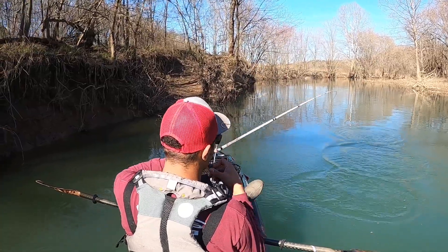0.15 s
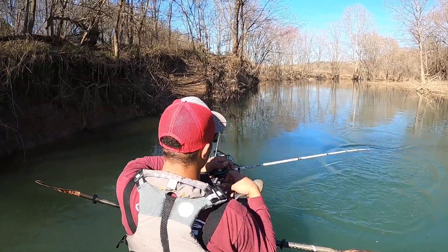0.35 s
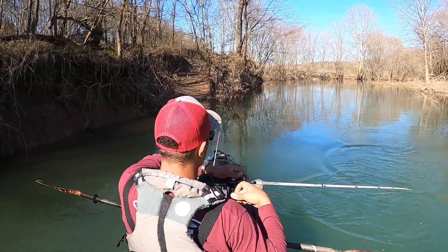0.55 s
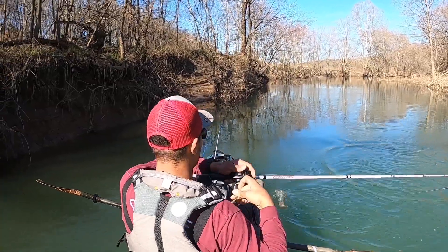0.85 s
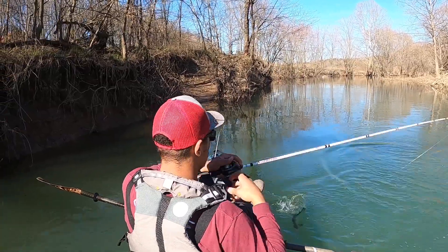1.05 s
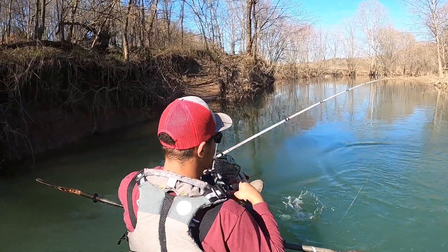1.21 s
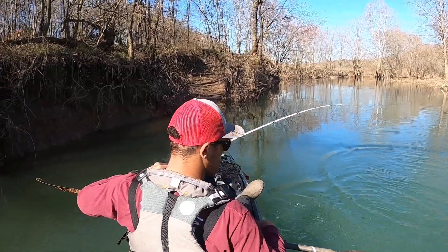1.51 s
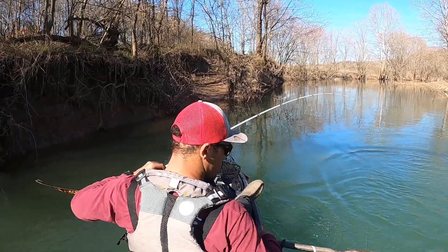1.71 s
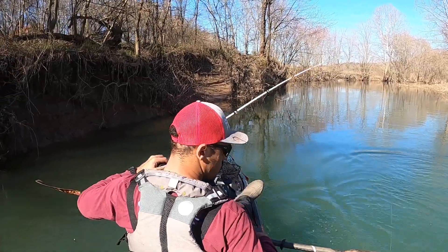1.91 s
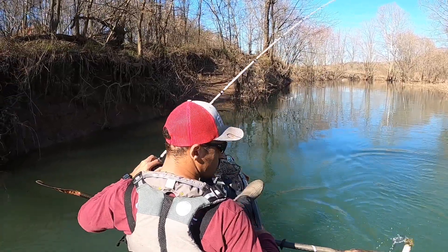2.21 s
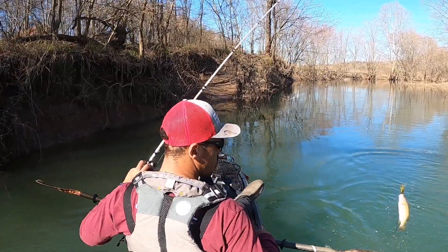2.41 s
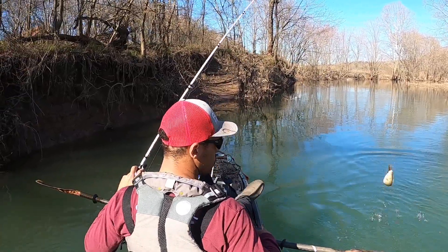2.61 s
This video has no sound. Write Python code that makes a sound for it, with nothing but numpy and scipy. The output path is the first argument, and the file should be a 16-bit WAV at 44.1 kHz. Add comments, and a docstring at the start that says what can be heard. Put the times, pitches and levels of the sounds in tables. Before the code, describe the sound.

Fish thrashing at calm water's surface, two bubbly splashes, preceded by a booming scrape on the hull

```python
"""A small hooked fish thrashes twice at the surface of a calm river beside a kayak: churned water is many
decaying bubble tones, and spray and slaps are shaped noise. Before that, something drags over the hull:
rough noise excites its resonances, which boom up the camera mount. Reel ticks are short damped tones.
Wash, rumble and hiss are filtered noise. The spectra carry the ring near 1.1 kHz and the dull treble
of a closed camera housing."""
import sys
import numpy as np
from scipy import signal
from scipy.fft import rfft, irfft, next_fast_len
from scipy.io import wavfile
from scipy.ndimage import uniform_filter1d, map_coordinates

SR = 44100
rng = np.random.default_rng(int(sys.argv[2]) if len(sys.argv) > 2 else 0)


def transcribe(u):
    """Save the signal u as a 16-bit wav file named by the first command-line argument.

    u: samples, shape (n,) or (channels, n), limited to [-1, 1]; the rate is SR.
    q: integer samples, one column per channel.
    """
    v = np.clip(np.atleast_2d(u).T, -1, 1)
    q = np.round(v * 32767).astype(np.int16)
    wavfile.write(sys.argv[1], SR, q)


def gain_from_db(level_db):
    """Convert decibel levels to linear amplitude factors (20 dB per decade)."""
    decades = np.asarray(level_db, float) / 20
    return 10 ** decades


N = 121275  # length [samples]
OFF_DB = -120  # level outside the span of a level table

# wash on the water, swelling with the bursts: (time [s], level [dB])
WASH_LEVEL = [(0, -56.5), (.9, -56.5), (1.13, -44.5), (1.58, -61), (2.15, -63), (2.37, -43.5),
              (2.55, -59.5), (2.75, -53.5)]
# spectra of wash, low rumble and thin hiss: (frequency [Hz], density [dB])
WASH_SPECTRUM = [(110, -100), (210, -33), (350, -14), (640, -6), (810, -9), (1170, 9), (1520, -4.5),
                 (2250, -16.5), (2700, -36), (4000, -98.5)]
RUMBLE_SPECTRUM = [(22, -13), (56, -11), (103, -25.5), (155, -2.5), (400, -17), (520, -49), (880, -120)]
HISS_SPECTRUM = [(1800, -27.5), (2500, -5.5), (5300, -4.5), (6700, -10.5), (8700, -25.5), (13400, -26),
                 (14000, -94)]
RUMBLE_DB, HISS_OVER_RUMBLE_DB = -67.5, -12.5

# ticks of the reel and a faint scuff: (time [s], level [dB])
TICKS = [(0.1925, -37.5), (0.6374, -39)]
SCUFF = [(.343, -63.5)]
# spectrum of the scuff: (frequency [Hz], density [dB])
SCUFF_SPECTRUM = [(2500, -64), (3250, -9), (3750, -12.5), (4600, -63)]
TICK_HZ, TICK_T60_S, TICK_ATTACK_S = 1837, 0.0098, 0.0012

# dragging on the hull: (time [s], boom level [dB], body over boom [dB], rasp over boom [dB])
DRAG = [(0.08, -72, 13, -4), (0.112, -53, -5.5, -11), (0.222, -61, -5, -18.5), (0.228, -30, 0.5, -2.5),
        (0.244, -23, -12, -8.5), (0.274, -20.5, -12.5, -32.5), (0.306, -24, -32, -27),
        (0.325, -31, -26, -24), (0.332, -27, -1, -7), (0.354, -32, 4, -5.5), (0.426, -20.5, -12, -34),
        (0.442, -27.5, -11.5, -3.5), (0.472, -28, -6, -6), (0.518, -34, -13, -15.5), (0.552, -44, -10, -6),
        (0.62, -41, -19.5, -24), (0.784, -72, -16, 11.5)]
# wandering contact: (time [s], boom tilt to its lowest mode [dB], rasp tilt to its upper modes [dB])
CONTACT = [(0.257, -7, -6), (0.286, 5, -4), (.36, -0.5, -5), (.43, -4.5, 2.5), (.52, 3.5, 3), (.6, 4, 6.5)]
# hull resonances: (frequency [Hz], width [Hz], level [dB])
BOOM_MODES = [(166.7, 67, 5), (236.4, 74, 4.5), (334.2, 50, -2)]
BODY_MODES = [(507.7, 66, -0.5), (613, 87, -3), (683, 31, -8.5)]
RASP_MODES = [(1111.5, 56, 7.5), (956, 130, 0.5), (1280, 100, 1), (1530, 90, -4), (1674, 37, -5.5),
              (1888, 100, -8)]
# sub-bass sway of the mount: (frequency [Hz], density [dB])
SWAY_SPECTRUM = [(13, -73.5), (30, -26), (50, -24.5), (120, -17.5), (260, -120)]
# later soft bumps on the hull: (time [s], level [dB])
BUMPS = [(0.944, -55), (2.199, -53.5), (2.344, -48), (2.369, -56.5)]
SWAY_UNDER_BOOM_DB, BUMP_T60_S, MOUNT_TOP_HZ = -16.5, 0.19, 2250

# churned water, one table per burst: (time [s], gurgle level [dB], deep bubbles over gurgle [dB])
CHURN = [
    [(0.92, -101.5, -16), (0.934, -16, -37.5), (0.96, -35.5, -12), (1.14, -41.5, -3.5),
     (1.192, -49.5, -3.5), (1.252, -34.5, -2.5), (1.34, -39, -14), (1.4, -39.5, -21.5), (1.542, -56, -7),
     (1.62, -100, 15.5)],
    [(2.14, -65.5, -17), (2.21, -34.5, -24.5), (2.308, -36, -20.5), (2.41, -30, -27.5), (2.474, -39.5, -47),
     (2.6, -58, -29)],
]
# spray, one table per burst: (time [s], level [dB])
SPRAY_LEVEL = [
    [(0.92, -82), (0.93, -67.5), (1.164, -58.5), (1.192, -70), (1.228, -53.5), (1.362, -67), (1.396, -56),
     (1.47, -67), (1.5, -78), (1.7, -102)],
    [(2.08, -94), (2.19, -56.5), (2.29, -58), (2.33, -49), (2.424, -45.5), (2.47, -57.5), (2.604, -70),
     (2.75, -71)],
]
# spectra of gurgle, deep bubbles and spray: (frequency [Hz], density [dB])
GURGLE_SPECTRUM = [(200, -53.5), (560, -24), (859, -10), (1020, 2.5), (1260, -3.5), (1740, -13.5),
                   (1990, -17.5), (2400, -42), (5280, -120)]
DEEP_SPECTRUM = [(200, -31.5), (290, -21.5), (600, 6.5), (800, -1.5), (1040, -33), (1760, -120)]
SPRAY_SPECTRUM = [(1000, -96), (2400, -11), (3340, -1.5), (4350, -7.5), (5150, -7), (5900, -19.5),
                  (6500, -16.5), (8600, -35.5), (13400, -63.5), (14000, -120)]
# mist: level against spray, exponent of its extra swell, pitch above which it is heard
MIST_DB, MIST_GROWS, MIST_HZ = -15, 0.34, 4230
# big single bubbles: (time [s], relative level [dB], starting pitch [Hz], t60 [s])
BUBBLES = [(0.934, -16, 1120, 0.022), (0.96, -29, 1150, 0.024), (0.979, -23.5, 1150, 0.034),
           (1.002, -26, 1017, 0.064), (1.026, -29.5, 1150, 0.082), (1.06, -19.5, 963, 0.029),
           (1.083, -17.5, 1016, 0.024), (1.138, -31.5, 982, 0.088), (1.162, -16, 1270, 0.027),
           (1.166, -19, 1078, 0.037), (1.208, -16.5, 984, 0.03), (1.225, -18.5, 1142, 0.03),
           (1.256, -13.5, 993, 0.032), (1.266, -22, 1147, 0.03), (1.307, -34.5, 1099, 0.088),
           (1.375, -35, 1052, 0.027), (2.186, -28.5, 1280, 0.017), (2.203, -36, 1295, .02),
           (2.223, -43, 2000, 0.056), (2.318, -38.5, 1946, .035), (2.261, -34, 1020, 0.044),
           (2.211, -28, 1077, 0.055), (2.224, -25.5, 910, 0.023), (2.313, -37, 968, 0.04),
           (2.344, -26, 1082, 0.014), (2.377, -24, 1051, 0.015), (2.404, -33, 865, 0.067),
           (2.419, -28.5, 1112, 0.039), (2.458, -30.5, 1076, 0.055), (2.501, -34.5, 1106, 0.047)]
BUBBLE_RISE, BUBBLE_ATTACK_S = 0.067, 0.0013  # rise: half the relative pitch gain over one t60
# neighbour of each big bubble: greatest relative pitch offset and greatest lag
TWIN_SPREAD, TWIN_LAG_S = 0.17, 0.005945
# long gliding bubbles: (time [s], level [dB], starting pitch [Hz], t60 [s], half the pitch gain over a t60 [1])
GLIDES = [(0.031, -32.5, 951, .12, -.15), (0.955, -40, 553.5, 0.17, -0.27), (1.113, -28.5, 473, .06, .05),
          (1.166, -26.5, 387, 0.059, -0.1), (1.198, -33, 307, 0.11, -0.093), (1.257, -33, 556, 0.057, -0.9),
          (1.283, -19.5, 533, 0.047, 0.72), (1.315, -33, 597, 0.11, .05), (1.458, -28, 1020, 0.075, -0.27),
          (1.474, -28.5, 780, 0.26, 1.7), (1.703, -26, 846, .2, 1.62)]
GLIDE_ATTACK, BURST_HZ = 0.15, 1260  # attack as a share of t60; pitch at which a rising bubble is gone
# drops slapping the surface: (time [s], low-band level [dB], sizzle above the split over it [dB])
SLAPS = [(0.9326, -44, -16.5), (0.957, -48, -4), (1.1191, -58.5, 3), (1.1574, -46.5, -23),
         (1.2309, -43.5, -8), (1.2514, -46, -7), (1.338, -48.5, -9), (1.4014, -43.5, -14),
         (1.4246, -57, -1.5), (1.4675, -55, -8), (1.6307, -58.5, -24), (2.1898, -46, -34.5),
         (2.3194, -33.5, -27), (2.4835, -34.5, -29.5), (2.5392, -46.5, -18), (2.6453, -50.5, -22),
         (2.7036, -57, -4)]
SLAP_T60_S, SPLIT_HZ = 0.03, 5700

# left over right, through the air and through the hull: (frequency [Hz], level difference [dB])
PAN = [(240, -3.5), (970, 4), (1550, 1.5), (2460, 6), (3700, 8.5), (5200, -5.5), (8500, 9), (12500, 8.5)]
HULL_PAN = [(40, -4), (90, 3), (125, -12.5), (170, -10), (240, -12.5), (320, 9.5), (470, -2), (1320, 0.5)]
# lead of left on right: (frequency [Hz], phase [rad])
LEAD = [(200, 0), (1460, .25), (2070, 0), (2410, -2.4), (2670, -1.4), (3360, -.5), (4050, -.6),
        (4910, -3.2), (6200, -3)]
HULL_LEAD = [(55, 1), (110, -2), (260, 0.93), (780, 0.6), (1210, 0.42), (2150, -1)]
# likeness of left and right before pan and lead: (frequency [Hz], correlation [1])
WATER_ALIKE = [(250, 0.88), (1200, 1), (2500, 0.84), (5000, 0.21), (9000, 0.42)]
AIR_ALIKE = [(300, 0.3), (1000, 0.89), (2000, 0.69), (4000, 0.27)]
HULL_ALIKE = [(35, 1), (80, 0.25), (170, 0.98), (300, 0.3), (1000, 1)]
WATER_PLACE = PAN, LEAD, WATER_ALIKE
AIR_PLACE = PAN, LEAD, AIR_ALIKE
HULL_PLACE = HULL_PAN, HULL_LEAD, HULL_ALIKE


def unit(x):
    """Normalisation: scales to a root mean square of 1."""
    return x / np.sqrt(np.mean(x ** 2) + 1e-20)


def along(points, hz):
    """Logarithmic frequency axis: interpolates (frequency, value) points on it."""
    f, v = np.transpose(points)
    return np.interp(np.log(hz + 1), np.log(f + 1), v)


def levels(*tables):
    """Envelopes linear in decibels: one gain per column, later columns being relative to the first."""
    t = np.arange(N) / SR
    gains = 0
    for rows in tables:
        s, first, *rest = np.transpose(rows)
        columns = [first] + [first + r for r in rest]
        gains = gains + gain_from_db([np.interp(t, s, c, OFF_DB, OFF_DB) for c in columns])
    return gains


def filtered(x, response):
    """Convolution theorem: multiplies the spectrum of x by a complex response."""
    m = next_fast_len(N + 8192)
    return irfft(rfft(x, m) * response(np.fft.rfftfreq(m, 1 / SR)), m)[..., :N]


def shape(spectrum):
    """Spectral shaping: gain from (frequency, level) points."""
    return lambda hz: gain_from_db(along(spectrum, hz))


def resonant(modes):
    """Modal superposition: sums causal resonances, with a steep cut at the top of the mount."""
    def response(f):
        # each resonance is applied twice, for dark valleys between the modes
        total = sum(gain_from_db(db) * (1j * f * w / (c * c - f * f + 1j * f * w)) ** 2 for c, w, db in modes)
        return total / (1 + (f / MOUNT_TOP_HZ) ** 14)
    return response


def ports(pair, colour, pan, lead, alike):
    """Interchannel coherence: mixes two like signals to left and right; their mean has rms 1."""
    def response(hz, side):
        turn = np.arccos(np.clip(along(alike, hz), 0, 1)) / 2
        tilt = gain_from_db(side * along(pan, hz) / 2) * np.exp(0.5j * side * along(lead, hz))
        return colour(hz) * tilt * [np.cos(turn), side * np.sin(turn)]
    both = np.array([filtered(pair, lambda hz: response(hz, side)).sum(0) for side in (1, -1)])
    return both / np.sqrt(np.mean(both.mean(0) ** 2))


def scaled(pair, *setting):
    """Power matching: ports whose mean has the rms of the first signal of the pair."""
    return ports(pair, *setting) * np.sqrt(np.mean(pair[0] ** 2))


def chirps(s, size, hz, t60, rise, attack):
    """Damped oscillation: sines decaying by 60 dB per t60, their pitch gliding linearly by 2 * rise."""
    t = np.arange(int(np.max(t60) * SR)) / SR
    s, size, hz, t60 = (np.reshape(v, (-1, 1)) for v in (s, size, hz, t60))
    envelope = size * gain_from_db(-60 * t / t60) * (1 - np.exp(-t / attack)) ** 2
    wave = envelope * np.sin(2 * np.pi * hz * t * (1 + rise * t / t60))
    at = np.round(s * SR).astype(int) + np.arange(len(t))
    return np.bincount(at.ravel(), wave.ravel(), N + len(t))[:N]


def grains(count, lo_hz, hi_hz, cycles, scatter_db, rise, hiss):
    """Random superposition: two streams of bubble tones of even spectrum, over a share of noise."""
    streams = []
    for u, noise in zip(rng.random((2, count, 3)), rng.standard_normal((2, N))):
        s = u[:, 0] * N / SR
        hz = lo_hz * (hi_hz / lo_hz) ** u[:, 1]
        size = hz * gain_from_db(-scatter_db * np.log(1 - u[:, 2]))
        tones = chirps(s, size, hz, cycles / hz, rise, 2.3 / hz[:, None])
        streams.append(unit(tones) + hiss * noise)
    return np.array(streams)


def puffs(rows, t60):
    """Exponential decay: a pair of noises, starting sharply at each row and dying by 60 dB per t60."""
    s, db = np.transpose(list(rows))
    starts = np.bincount(np.round(s * SR).astype(int), gain_from_db(db), N)
    return rng.standard_normal((2, N)) * signal.lfilter([1], [1, -gain_from_db(-60 / t60 / SR)], starts)


def patchy_noise():
    """Modulated noise: four streams share random level patches in time and frequency."""
    z = signal.stft(rng.standard_normal((4, N)), nperseg=512)[2]
    field = uniform_filter1d(rng.standard_normal(z.shape[1:]), 5, 0)
    field = uniform_filter1d(field, 8, 1)
    patch_db = 2.58 * unit(field)
    return signal.istft(z * gain_from_db(patch_db), nperseg=512)[1][:, :N]


def air():
    """Filtered noise: a swelling wash through the housing, over low rumble and thin hiss."""
    noise = patchy_noise()

    def floor_colour(hz):
        rumble = unit(shape(RUMBLE_SPECTRUM)(hz))
        return rumble + gain_from_db(HISS_OVER_RUMBLE_DB) * unit(shape(HISS_SPECTRUM)(hz))
    wash = levels(WASH_LEVEL) * ports(noise[:2], shape(WASH_SPECTRUM), *AIR_PLACE)
    return wash + gain_from_db(RUMBLE_DB) * ports(noise[2:], floor_colour, *AIR_PLACE)


def reel():
    """Impulse response: dry ticks are short damped tones, and a faint scuff is decaying noise."""
    s, db = np.transpose(TICKS)
    each = np.ones(len(s))
    ticks = chirps(s, gain_from_db(db + 7.0), TICK_HZ * each, TICK_T60_S * each, rise=0, attack=TICK_ATTACK_S)
    return ticks + scaled(puffs(SCUFF, t60=0.12), shape(SCUFF_SPECTRUM), *WATER_PLACE)


def slips():
    """Rough friction: a pair of noises whose shared level flutters slightly."""
    flutter_db = 0.5 * map_coordinates(rng.standard_normal(N // 150 + 4), [np.arange(N) / 150])
    return rng.standard_normal((2, N)) * gain_from_db(flutter_db)


def hull():
    """Forced resonance: rough slips excite the hull's modes, heard through the mount; later soft bumps."""
    boom, body, rasp = levels(DRAG)
    s, *columns = np.transpose(CONTACT)
    low, upper = gain_from_db([np.interp(np.arange(N) / SR, s, c) for c in columns])
    # the place of contact sets the balance among the modes
    parts = [
        (boom * low / 2, BOOM_MODES[:1]),
        (boom / low / 2, BOOM_MODES[1:]),
        (body, BODY_MODES),
        (rasp / upper / 2, RASP_MODES[:1]),
        (rasp * upper / 2, RASP_MODES[1:]),
    ]
    drag = sum(gain * ports(slips(), resonant(modes), *HULL_PLACE) for gain, modes in parts)
    sway = gain_from_db(SWAY_UNDER_BOOM_DB) * boom * ports(slips(), shape(SWAY_SPECTRUM), *HULL_PLACE)
    bumps = scaled(puffs(BUMPS, BUMP_T60_S), resonant(BOOM_MODES), *HULL_PLACE)
    return drag + sway + bumps


def churned_water():
    """Bubble resonance: small bubbles sound high and large ones deep, in clouds that follow the churn."""
    gurgle, deep = levels(*CHURN)
    small = grains(count=1600, lo_hz=630.0, hi_hz=2504, cycles=18, scatter_db=1.0, rise=0.1, hiss=0.79)
    large = grains(count=300, lo_hz=335.4, hi_hz=817, cycles=31, scatter_db=0.5, rise=0.18, hiss=0.61)
    out = gain_from_db(-4.5) * gurgle * ports(small, shape(GURGLE_SPECTRUM), *WATER_PLACE)
    return out + deep * ports(large, shape(DEEP_SPECTRUM), *WATER_PLACE)


def spray_and_mist():
    """Grain density: the finest bubbles fuse into spray; mist is noise that swells faster than it."""
    spray = levels(*SPRAY_LEVEL)
    fine = grains(count=14000, lo_hz=2268, hi_hz=14900, cycles=27, scatter_db=3.5, rise=0.068, hiss=0.28)

    def mist_colour(f):
        return shape(SPRAY_SPECTRUM)(f) * (f / MIST_HZ) ** 3 / (1 + f / MIST_HZ)
    mist = ports(rng.standard_normal((2, N)), mist_colour, *WATER_PLACE)
    mist_gain = gain_from_db(MIST_DB) * spray * (spray / spray.max()) ** MIST_GROWS
    return spray * ports(fine, shape(SPRAY_SPECTRUM), *WATER_PLACE) + mist_gain * mist


def single_bubbles():
    """Damped bubble oscillation: loud bubbles, their neighbours of another size, and long glides."""
    s, db, hz, t60 = np.transpose(BUBBLES)
    big = chirps(s, gain_from_db(db + 6.5), hz, t60, BUBBLE_RISE, BUBBLE_ATTACK_S)
    u = rng.uniform(-1, 1, (len(s), 2))
    twin_s = s + TWIN_LAG_S * abs(u[:, 0])
    twin_hz = hz * (1 + TWIN_SPREAD * (u[:, 1] + np.sign(u[:, 1])) / 2)  # at least half the spread away
    big = big + chirps(twin_s, gain_from_db(db - 1), twin_hz, t60, BUBBLE_RISE, BUBBLE_ATTACK_S)

    s, db, hz, t60, rise = np.transpose(GLIDES)
    glides = chirps(s, gain_from_db(db), hz, t60, rise[:, None], GLIDE_ATTACK * t60[:, None])
    big = big + filtered(glides, lambda f: 1 / (1 + (f / BURST_HZ) ** 20))
    # a high-pass at 230 Hz keeps the deep bass clear
    tones = scaled(np.array([big, 0 * big]), lambda f: 1 / (1 + (230 / (f + 1)) ** 8), *WATER_PLACE)
    bursts = puffs([row[:2] for row in BUBBLES], t60=0.021)
    return tones + gain_from_db(-13.5) * scaled(bursts, shape(GURGLE_SPECTRUM), *WATER_PLACE)


def slaps():
    """Impact noise: each drop gives a decaying puff below the split and a sizzle above it."""
    s, db, sizzle_db = np.transpose(SLAPS)
    out = 0
    for level_db, slope in [(db, -8), (db + sizzle_db, 8)]:  # low-pass, then high-pass
        def band(f):
            return shape(SPRAY_SPECTRUM)(f) / (1 + (SPLIT_HZ / (f + 1)) ** slope)
        out = out + gain_from_db(-4.5) * scaled(puffs(zip(s, level_db), SLAP_T60_S), band, *WATER_PLACE)
    return out


def splash():
    """Superposition: the thrashing fish is bubble clouds, spray, single bubbles and slaps together."""
    return churned_water() + spray_and_mist() + single_bubbles() + slaps()


def scene():
    """Superposition: air, reel, hull and fish add linearly."""
    return air() + reel() + hull() + splash()


def roll_off(x):
    """The treble ends steeply here."""
    return signal.sosfilt(signal.butter(12, 13500, fs=SR, output="sos"), x)


def record(dry):
    """Unity gain: the finished mix is the scene at its own level."""
    return roll_off(dry)


dry = scene()
out = record(dry)
transcribe(out)
```